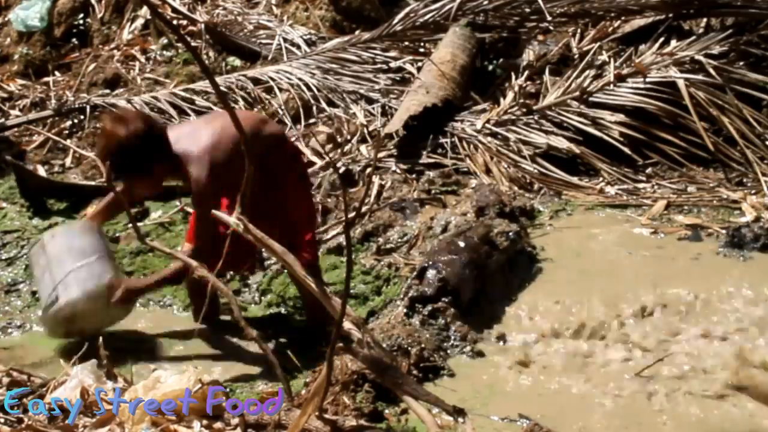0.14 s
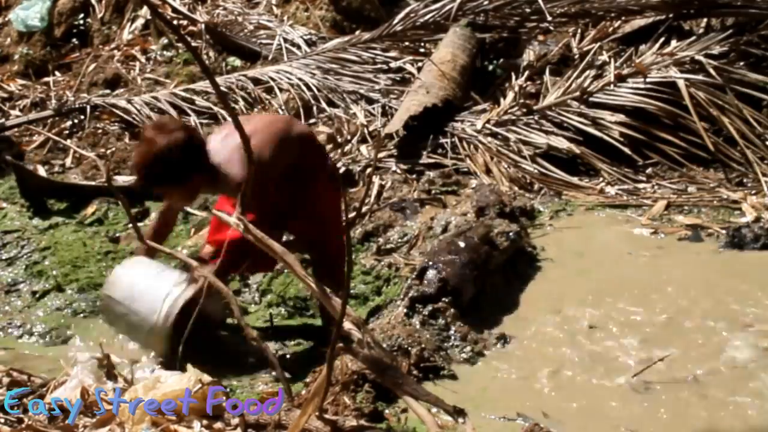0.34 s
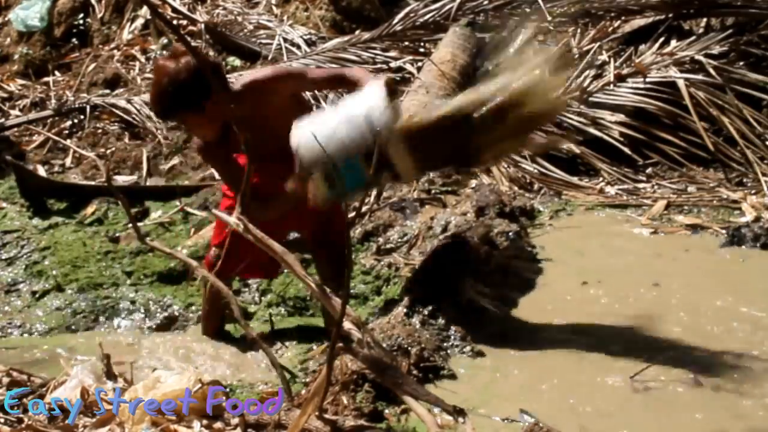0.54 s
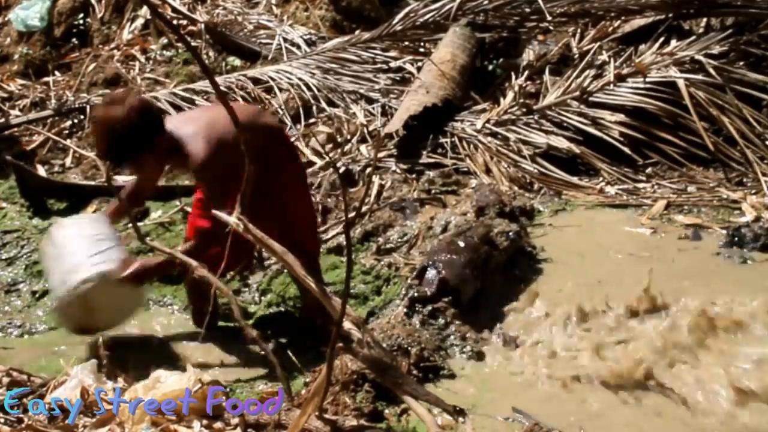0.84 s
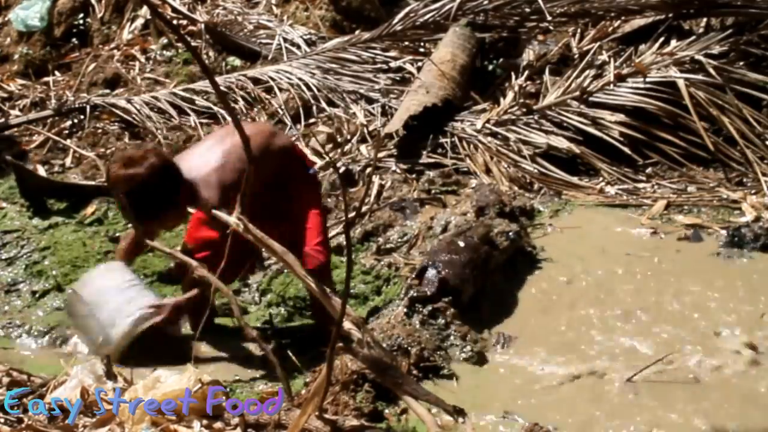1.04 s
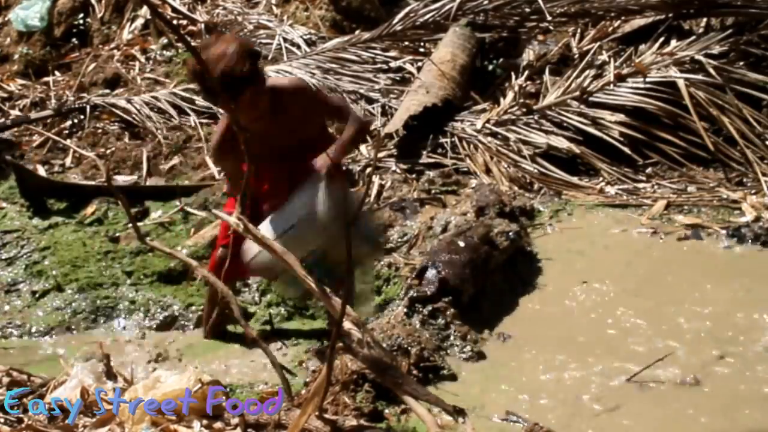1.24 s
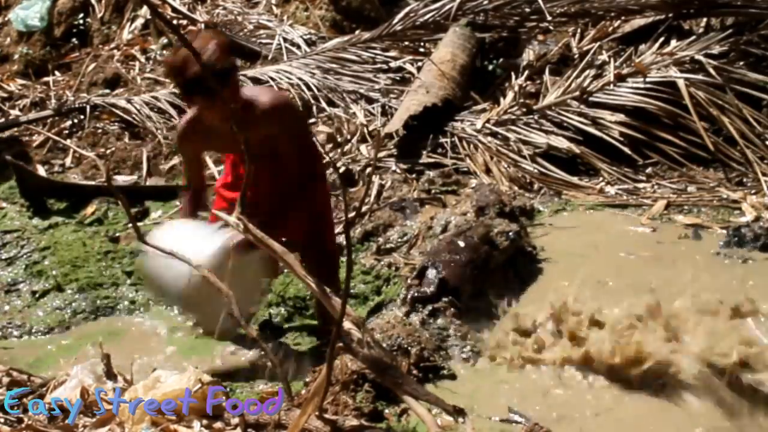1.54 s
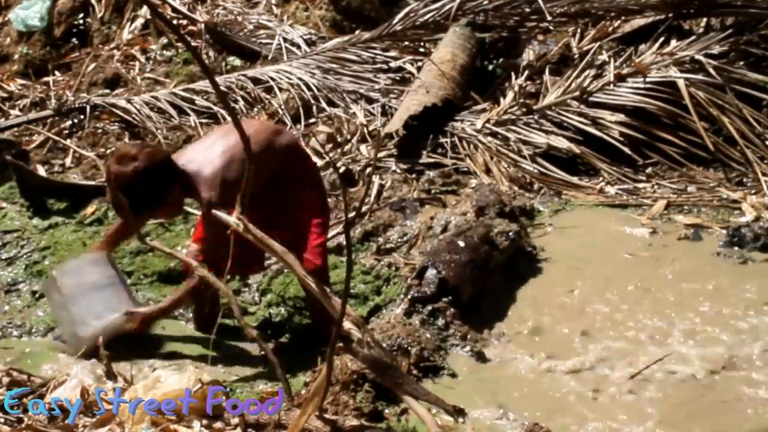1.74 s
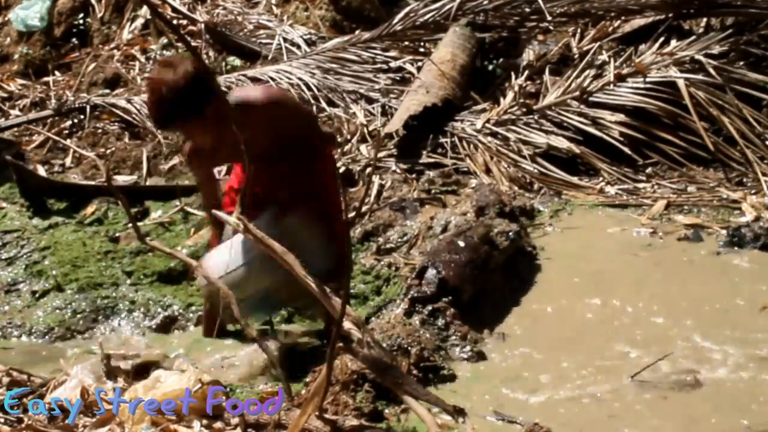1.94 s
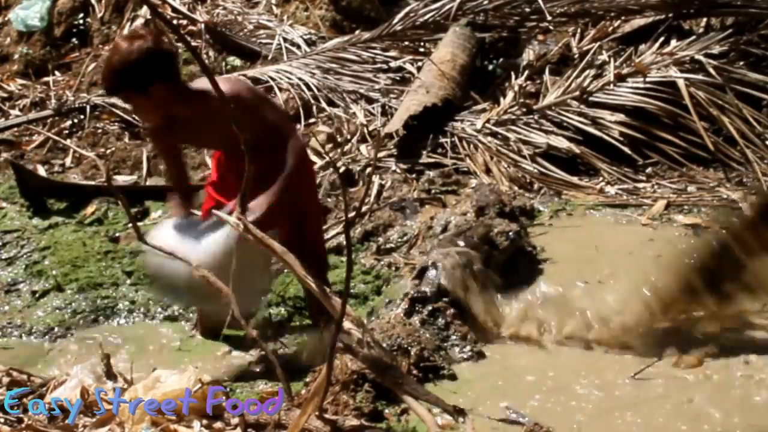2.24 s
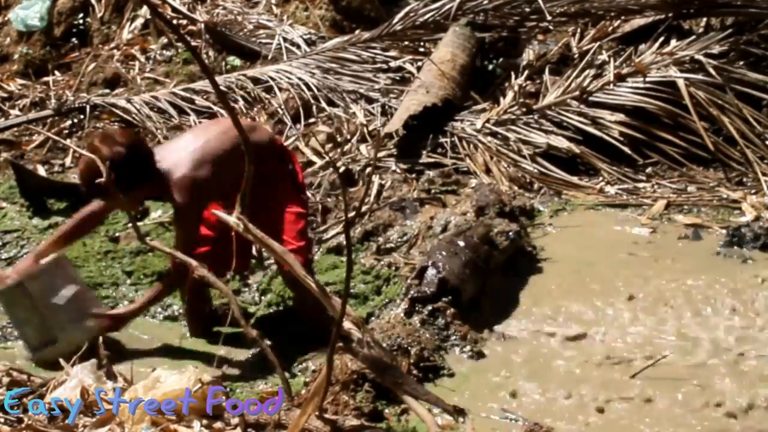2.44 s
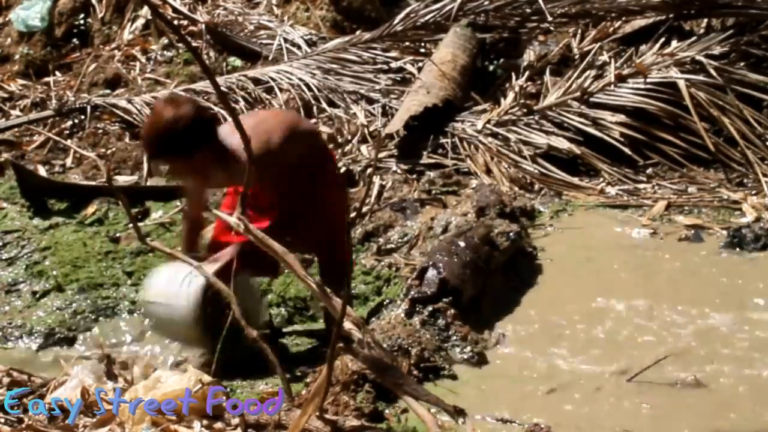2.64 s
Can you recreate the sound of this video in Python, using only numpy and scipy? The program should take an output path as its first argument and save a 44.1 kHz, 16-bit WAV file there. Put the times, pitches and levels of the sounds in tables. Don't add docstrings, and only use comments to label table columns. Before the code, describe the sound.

Water is bailed by bucket from a shallow muddy pool. A load splashes down at about 0.1 s with a low thump and bright spray, then trickles away; around 0.5 s the bucket slaps the surface and gulps hollowly. More loads crash down near 0.85, 1.6 and 2.35 s, with stirring, bubble plops and droplets between. It ends mid-stirring near 2.8 s, over faint open-air noise.

```python
import sys
import numpy as np
from scipy import signal
from scipy.fft import rfft, irfft
from scipy.io import wavfile

SR = 44100
rng = np.random.default_rng(int(sys.argv[2]) if len(sys.argv) > 2 else 0)


def digitize_waveform(pressure):
    field = np.atleast_2d(pressure).T
    bounded = np.clip(field, -1, 1)
    quanta = np.round(bounded * 32767).astype(np.int16)
    wavfile.write(sys.argv[1], SR, quanta)


def gain_from_decibels(decibels):
    exponent = np.asarray(decibels, float) / 20
    return 10 ** exponent


N = 123479


def rms_one(x):
    return x / np.sqrt(np.mean(x ** 2) + 1e-20)


def filtered(x, order, hz, kind="low"):
    return signal.sosfilt(signal.butter(order, hz, kind, fs=SR, output="sos"), x)


def at_hz(points, hz):
    corner_hz, db = np.transpose(points)
    return np.interp(np.log(np.maximum(hz, 1)), np.log(corner_hz), db)


def drift(rate_hz):
    step = 40
    r = np.exp(-2 * np.pi * rate_hz * step / SR)
    slow = signal.lfilter([1], [1, -2 * r, r * r], rng.standard_normal(N // step + 2002))
    slow = rms_one(slow[2000:])
    return np.interp(np.arange(N) / step, np.arange(len(slow)), slow)


def ring(clicks, hz, t60):
    r, w = gain_from_decibels(-60 / (t60 * SR)), 2 * np.pi * hz / SR
    return signal.lfilter([0, np.sin(w)], [1, -2 * r * np.cos(w), r * r], clicks + 1e-18)


def coloured(spectrum):
    gain = gain_from_decibels(at_hz(spectrum, np.fft.rfftfreq(N, 1 / SR)))
    return rms_one(irfft(rfft(rng.standard_normal(N)) * gain, N))


# f/Hz, level/dB
AIR = [(15, -41), (25, -10), (246, -8.5), (1020, -6), (4380, -14), (4750, -15), (15500, -30)]


def open_air():
    return gain_from_decibels(-48.5) * coloured(AIR)


# t/s (delay), level/dB
ECHOES = [
    (.011, -18),
    (.023, -22),
]


def echoes(near):
    dull = filtered(near, 1, 6000)
    return sum(gain_from_decibels(db) * np.pad(dull, (int(s * SR), 0))[:N] for s, db in ECHOES)


def gurgles(level, per_s, gain_db, low_hz, high_hz):
    cycles, pitch_rise = 2.7, 0.19
    out, count = np.zeros(N + SR), 200
    for when, size, luck, keep in rng.random((count, 4)):
        i = int(when * (N - 1))
        hz = low_hz * (high_hz / low_hz) ** (size * size)
        c = np.arange(int(3 * cycles / hz * SR)) * hz / SR
        shape = (1 - np.exp(-c)) * np.exp(-2 * c / cycles)
        shape = shape * (keep < per_s * N / SR / count)
        db = min(level[i], -36) + gain_db + 10 * (luck - .5)
        chirp = np.sin(2 * np.pi * c * (1 + pitch_rise * c / cycles / 2))
        out[i:i + len(c)] += gain_from_decibels(db) * shape * chirp
    return out[:N]


# t/s, length/s, level/dB, f/Hz (centre)
SPATTERS = [(1.139, .008, -46, 9000), (1.154, .016, -37, 7000), (1.2, .005, -40, 5000),
            (1.207, .014, -36, 5000), (1.252, .004, -32, 5000), (1.28, .013, -33, 7000),
            (1.307, .006, -44, 9000), (1.359, .005, -38, 4000), (1.372, .012, -43, 8000),
            (1.4785, .006, -44, 6000), (1.52, .005, -36, 4000), (.475, .012, -42, 6000),
            (.844, .006, -30, 4600), (1.893, .006, -44, 6000), (2.001, .012, -41, 5000),
            (2.101, .014, -41, 7000), (2.284, .006, -37, 5000), (2.738, .008, -42, 8000),
            (2.786, .012, -37, 6000), (.8026, .004, -45, 8000)]


def spatters():
    out, half_width_octaves = np.zeros(N + SR), .65
    for s, length, db, hz in SPATTERS:
        ticks = rng.standard_normal(SR // 20) * rng.exponential(1, SR // 20)
        edges = np.minimum(hz * 2 ** (half_width_octaves * np.array([-1, 1])), .4 * SR)
        u, i = np.arange(len(ticks)) / (length * SR), int(s * SR)
        shape = np.clip(10 * u, 0, 1) * gain_from_decibels(-6 * u - 40 * np.maximum(u - 1, 0))
        out[i:i + len(u)] += gain_from_decibels(db - 3) * shape * rms_one(filtered(ticks, 2, edges, "band"))
    return out[:N]


# t/s, level/dB (peak), f/Hz, length/cycles
POPS = [(.2595, -20, 8300, 9.0), (.8333, -10, 3300, 3.5), (1.5961, -3, 1020, 2.6), (1.5965, -12, 2250, 5.0),
        (1.583, -20, 720, 4.0), (1.3238, -13, 1950, 8.0), (1.3236, -23, 4500, 6.0),
        (2.0645, -13, 1250, 4.0), (2.0655, -22, 2250, 6.0), (2.0645, -20, 4200, 6.0),
        (2.075, -24, 2500, 8.0), (2.082, -22, 1300, 6.0), (2.138, -24, 1500, 5.0), (2.366, -12, 820, 4.0),
        (2.348, -18, 470, 4.0), (2.433, -17, 746, 5.0), (2.457, -18, 850, 5.0), (1.746, -28, 1000, 6.0),
        (.321, -30, 6500, 9.0), (2.582, -22, 7000, 9.0), (.279, -30, 930, 8.0), (1.129, -33, 1050, 6.0),
        (2.623, -31, 781, 7.0), (2.635, -30, 740, 5.0)]


def pops():
    out = np.zeros(N + SR)
    for s, db, hz, cycles in POPS:
        u = np.arange(int(2 * cycles / hz * SR)) * hz / SR / cycles
        i = int(s * SR)
        swell = 4 * u * np.exp(1 - 4 * u)
        out[i:i + len(u)] += gain_from_decibels(db) * swell * np.sin(2 * np.pi * cycles * u)
    return out[:N]


# t/s, length/s, level/dB (peak), f/Hz
GULPS = [(.11, 0.016, -13, 520), (.154, 0.014, -14, 490), (.278, 0.028, -32, 200), (.357, 0.008, -33, 420),
         (.38, 0.055, -45.5, 232), (.485, 0.013, -12, 462), (.502, 0.01, -29, 500), (.518, .022, -35, 450),
         (.545, 0.011, -31, 410), (.863, 0.011, -15.5, 706), (.879, 0.009, -7, 474),
         (1.045, 0.014, -35, 520), (1.06, 0.024, -39.5, 200), (1.062, 0.0049, -27, 605),
         (1.1, 0.11, -41.5, 200), (1.141, 0.021, -23.5, 220), (1.27, 0.076, -45.5, 398),
         (1.33, 0.01, -30.5, 398), (1.43, 0.014, -49, 283), (1.476, 0.013, -43, 250),
         (1.671, 0.016, -27, 490), (1.852, 0.088, -30.5, 211.4), (1.888, 0.023, -28, 214),
         (1.936, 0.042, -36, 307), (1.992, 0.015, -35.5, 557), (2.069, 0.021, -29, 952),
         (2.403, 0.011, -18.5, 504), (2.53, 0.024, -39, 200), (2.631, 0.01, -28, 293),
         (0.663, 0.034, -51, 270), (.72, 0.032, -44.5, 240), (1.155, 0.0052, -26, 440),
           (1.176, .014, -31.5, 340), (1.203, 0.032, -37, 426), (1.914, 0.067, -41, 431.5),
           (1.587, 0.013, -23.5, 140), (2.145, 0.038, -39.5, 227), (2.639, 0.029, -38.5, 191.5),
           (2.175, .016, -38, 950), (2.15, .01, -36, 1000), (2.088, .006, -32, 600), (1.65, .015, -34, 400),
           (1.72, .025, -36, 500), (.18, .03, -26, 520), (.245, .012, -35, 520), (2.49, .03, -32, 780),
           (2.43, .012, -28, 450), (1.87, .03, -41, 800)]


def gulps():
    attack, glide, overtone_db = .15, .04, -22
    out, wobble = np.zeros(N + SR), gain_from_decibels(3.5 * drift(60))
    waver = np.tile(1 + .06 * drift(50), 2)
    for s, length, db, hz in GULPS:
        i = int(s * SR)
        u = np.arange(int(1.3 * length * SR)) / (length * SR)
        opening = np.sin(np.pi / 2 * np.clip(u / attack, 0, 1))
        closing = np.clip((1.3 - u) / .5, 0, 1)
        shape = opening * gain_from_decibels(-5 * u) * closing
        pitch = hz * (1 + glide * (u - .5)) * waver[i:i + len(u)]
        turn = 2 * np.pi * np.cumsum(pitch) / SR
        tone = np.sin(turn) + gain_from_decibels(overtone_db) * np.sin(2 * turn + 1)
        out[i:i + len(u)] += gain_from_decibels(db) * shape * tone
    return out[:N] * wobble


# f/Hz, level/dB
CRACK = [(120, -40), (350, -12), (600, -8.5), (1270, -2.5), (1660, -5.5), (8290, -22), (15500, -45)]
# t/s, level/dB (peak), f/Hz (bubble), level/dB (crack share)
SLAPS = [(0.061, -24, 5030, -16.5), (0.094, -16, 4470, -18), (0.1115, -11, 1270, 7),
         (0.446, -29, 1000, 6.5), (0.486, -14.5, 3080, -14), (0.541, -7, 1130, -9), (0.746, -26, 1520, -6),
         (0.863, -9.5, 974, 0.5), (1.161, -16.5, 995, -7.5), (1.25, -27, 2200, -10),
         (1.294, -20, 1370, -11), (1.3232, -11.5, 1310, -3), (1.333, -12, 2440, -34),
         (1.522, -25.5, 1900, -25), (1.58, -27, 3380, 6), (1.595, -18, 980, 8), (2.0645, -15, 960, 3),
         (2.137, -19, 1020, -5), (2.282, -44, 4460, -2), (2.677, -21.5, 1380, -4), (2.785, -23, 2250, -7)]


def slaps():
    swell_cycles, ring_cycles = 2.73, 14.7
    rise_s, crack_t60_s, wash_t60_s, wash_db = 0.00077, 0.016, .06, -4
    out, noise, t = np.zeros(N + SR), np.tile(coloured(CRACK), 2), np.arange(SR // 6) / SR
    rise = 1 - np.exp(-t / rise_s)
    decay = gain_from_decibels(-60 * t / crack_t60_s) + gain_from_decibels(wash_db - 60 * t / wash_t60_s)
    for s, db, hz, crack_db in SLAPS:
        i = int(s * SR)
        swell = 1 - np.exp(-(t * hz / swell_cycles) ** 2)
        bubble = 4 * swell * gain_from_decibels(-60 * t * hz / ring_cycles) * np.sin(2 * np.pi * hz * t)
        crack = gain_from_decibels(crack_db) * noise[i:i + len(t)] * rise * decay
        out[i:i + len(t)] += gain_from_decibels(db - 3) * (bubble + crack)
    return out[:N]


# t/s, level/dB, fineness/dB (treble tilt of the spray)
FALLS = [
    [(.05, -64, -22), (.085, -46.5, 6.5), (.105, -33, 5.5), (.113, -23.5, 3.5), (.17, -22, -7),
     (.205, -26, -3), (.222, -32, -3.5), (.31, -36, 0.1), (.36, -44, -4)],
    [(.81, -54.5, -27), (.828, -38.5, 4), (.856, -34.5, 9.5), (.865, -22, 2.5), (.92, -23.5, -7),
     (.96, -27.5, -4), (.99, -31, -5), (1.06, -37.5, -1.5), (1.085, -43.5, -2.5)],
    [(1.56, -51.5, 16), (1.578, -32.5, -3), (1.594, -20.5, 3), (1.62, -18, -7), (1.645, -26.5, -1.5),
     (1.66, -30, -5.5), (1.75, -31.5, -0.5), (1.81, -35, -2.5), (1.83, -39, -10)],
    [(2.27, -61, 8.5), (2.3, -43.5, 12), (2.335, -31.5, 1), (2.37, -19.5, -3), (2.41, -22, -2),
     (2.46, -27, -12), (2.48, -32, -3.5), (2.56, -33.5, -3.5), (2.615, -39.5, -1.5)],
]
# t/s, level/dB
SCOOPS = [
    [(.42, -44.5), (.47, -43), (.5, -38.5), (.53, -47), (.57, -40), (.62, -46.5), (.7, -56)],
    [(1.13, -44), (1.165, -41), (1.19, -43.5), (1.26, -42.5), (1.3, -39.5), (1.37, -42.5), (1.4, -47.5),
     (1.5, -50)],
    [(1.9, -48), (1.98, -45), (2.02, -41), (2.06, -43.5), (2.11, -42), (2.155, -48.5), (2.17, -45.5),
     (2.23, -53)],
    [(2.64, -39), (2.66, -43), (2.72, -41.5), (2.76, -43.5), (2.79, -40.5)],
]


def flow():
    landing = [row for fall in FALLS for row in fall]
    stirring = [(s, db, -5) for scoop in SCOOPS for s, db in scoop]
    s, level, fine = np.transpose(sorted(landing + stirring))
    return [np.interp(np.arange(N) / SR, s, column) for column in (level, fine)]


def grains(per_s, pitches, cycles, gains):
    sizes = gain_from_decibels(2.9 * np.minimum(rng.exponential(1, N), 5)) * rng.choice([-1, 1], N)
    sizes = sizes * (rng.random(N) < per_s / SR) / np.sqrt(per_s)
    dealt = rng.integers(0, len(pitches), N)
    out = np.zeros(N)
    for k, hz in enumerate(pitches):
        out += gains(hz) * rms_one(ring(sizes * (dealt == k), hz, cycles / hz))
    return out


# f/Hz, level/dB (per Hz)
SPRAY = [(59, -54), (100, 6), (362, -33), (487, -27), (614, -17.5), (1310, -4), (1590, -2), (6660, -6),
         (15500, -26)]


def falling_water(level, fine):
    spray_low_hz, foam_low_hz, foam_high_hz = 321, 432, 1030
    swing, together = level - level.mean(), drift(33)

    def spray_gain(hz):
        patchy = 1.6 * (.5 * together + drift(49))
        tilt = fine * np.log2(hz / 2500) / 2
        return np.sqrt(hz) * gain_from_decibels(at_hz(SPRAY, hz) - 38.5 + tilt + patchy)

    drops_per_s = np.clip(15000 * gain_from_decibels(.45 * swing), 500, SR * .9)
    spray = grains(drops_per_s, np.geomspace(spray_low_hz, 15000, num=28), 15, spray_gain)
    foam_per_s = 450 * gain_from_decibels(.5 * swing + 2 * drift(20))
    foam = grains(foam_per_s, np.geomspace(foam_low_hz, foam_high_hz, num=12), 11,
                  lambda hz: (foam_low_hz / hz) ** 1.33)
    thump = rms_one(filtered(rng.standard_normal(N), 2, [20, 200], "band"))
    water = gain_from_decibels(level - 1.5) * spray + gain_from_decibels(-56 + 1.116 * swing) * foam
    water = filtered(water, 2, 0.79 * spray_low_hz, "high")
    return water + gain_from_decibels(-85 + 2 * swing) * thump


def scene():
    level, fine = flow()
    near = falling_water(level, fine) + slaps() + gulps() + pops()
    near = near + gurgles(level, per_s=53, gain_db=-15.5, low_hz=250, high_hz=1470)
    near = near + gurgles(level, per_s=70, gain_db=8, low_hz=2000, high_hz=10000)
    return (near + echoes(near) + open_air() + spatters())[None]


def low_pass(x):
    return signal.sosfilt(signal.butter(12, 16810, fs=SR, output="sos"), x)


def record(dry):
    x = filtered(dry, 1, 116, "high")
    x = x / (1 + x ** 6) ** (1 / 6)
    x = signal.sosfilt(signal.cheby2(12, 45, 15700 * 1.02, fs=SR, output="sos"), x)
    return low_pass(x)


dry = scene()
out = record(dry)
digitize_waveform(out)
```